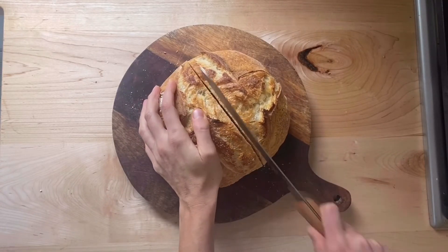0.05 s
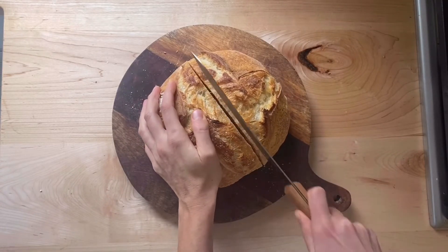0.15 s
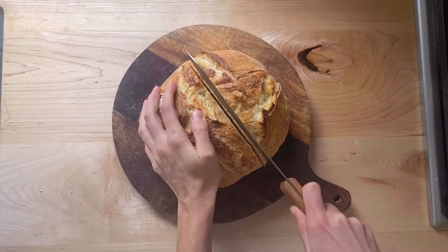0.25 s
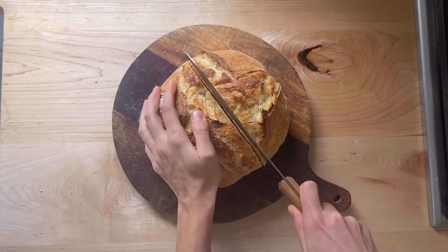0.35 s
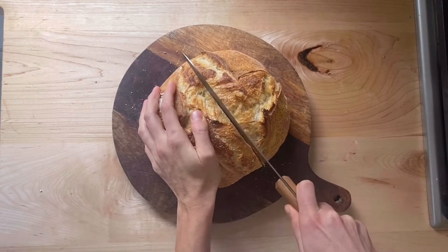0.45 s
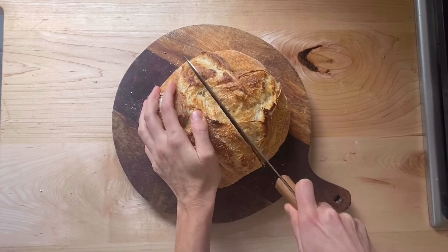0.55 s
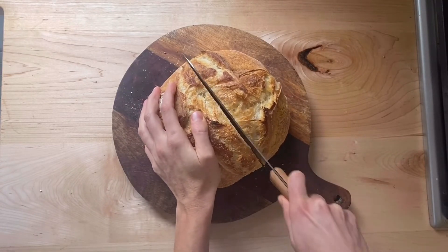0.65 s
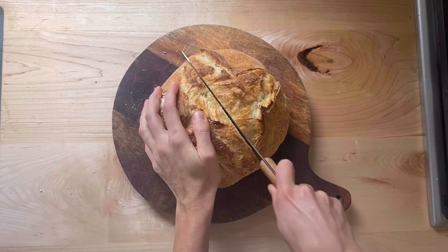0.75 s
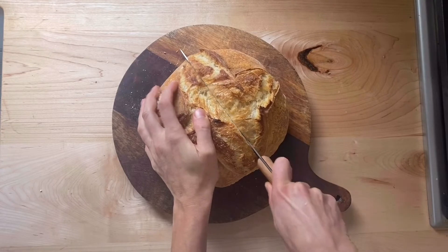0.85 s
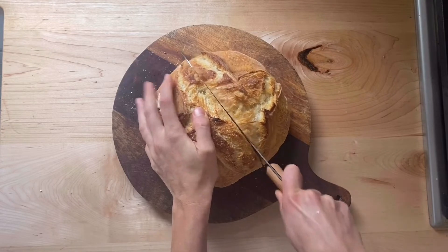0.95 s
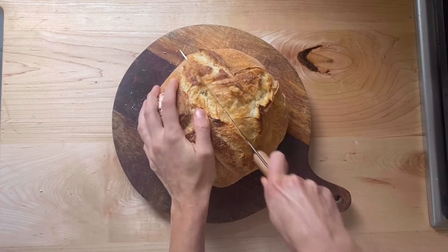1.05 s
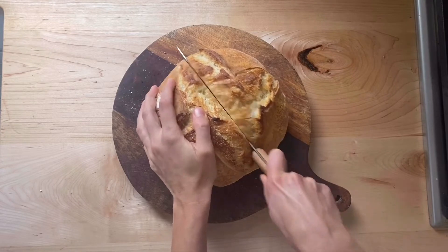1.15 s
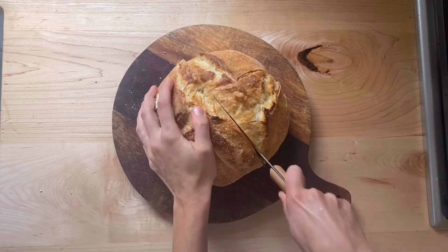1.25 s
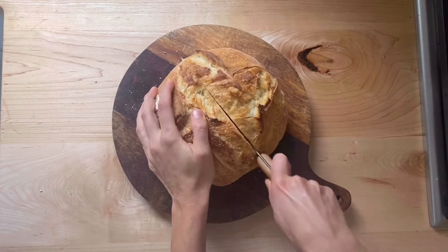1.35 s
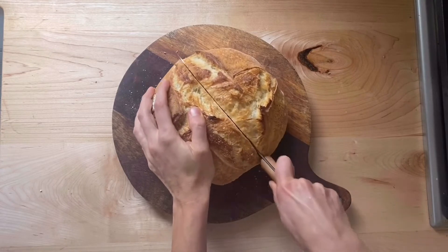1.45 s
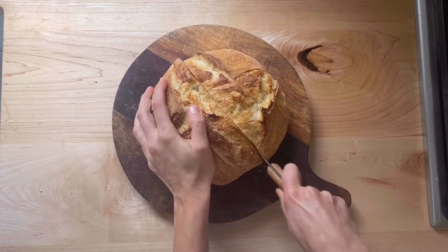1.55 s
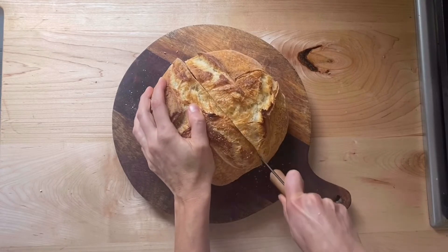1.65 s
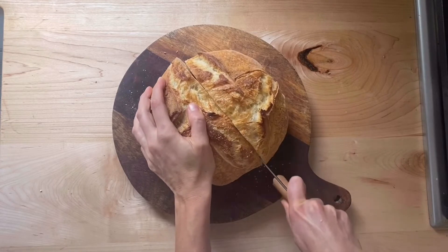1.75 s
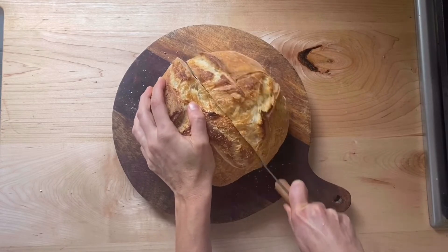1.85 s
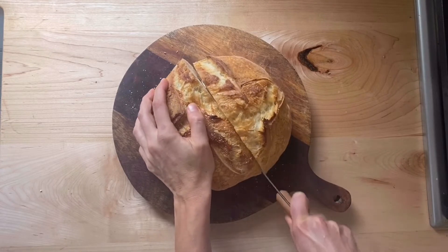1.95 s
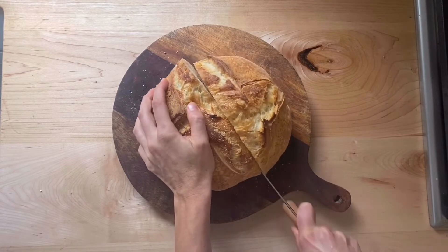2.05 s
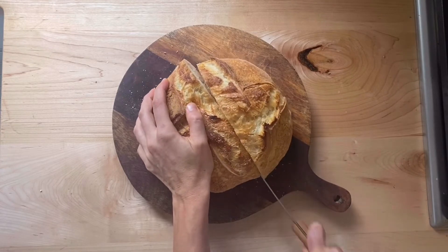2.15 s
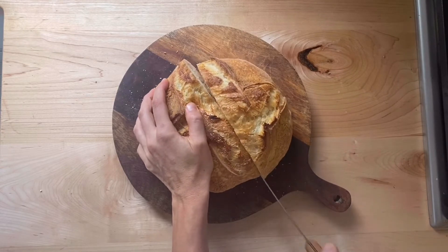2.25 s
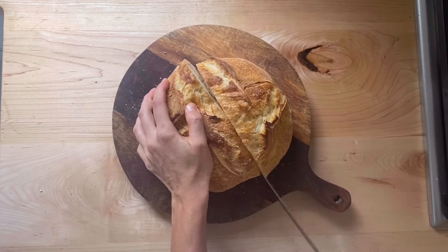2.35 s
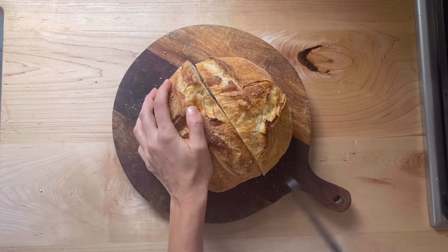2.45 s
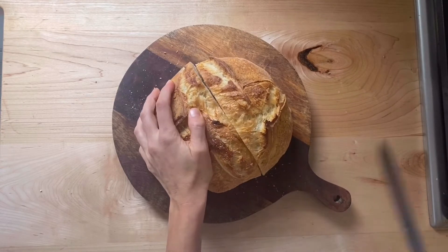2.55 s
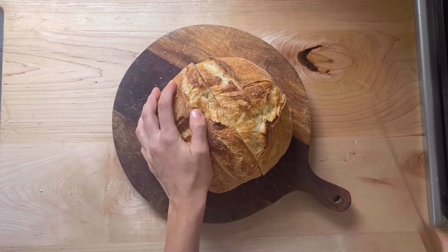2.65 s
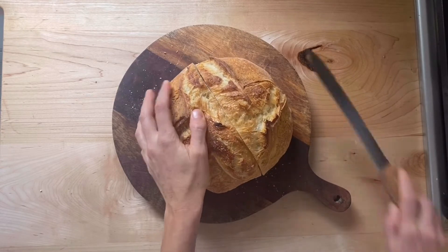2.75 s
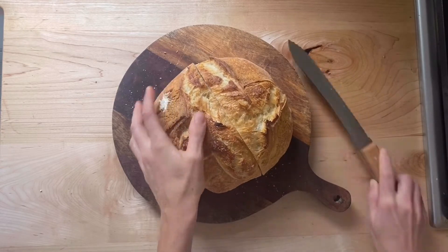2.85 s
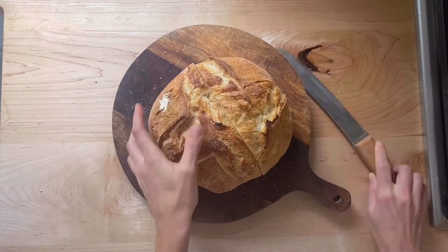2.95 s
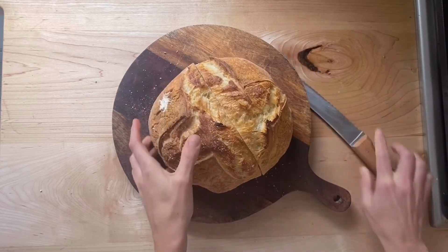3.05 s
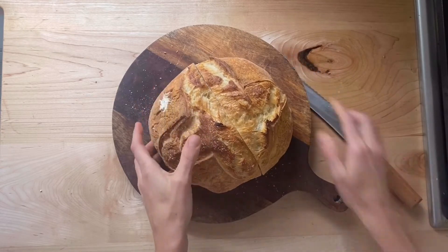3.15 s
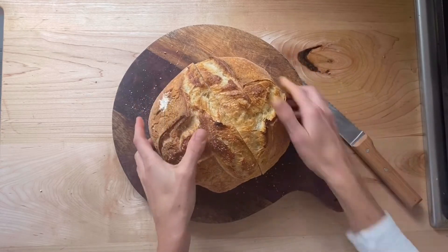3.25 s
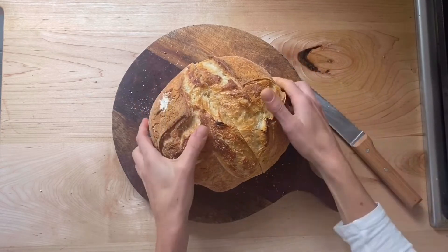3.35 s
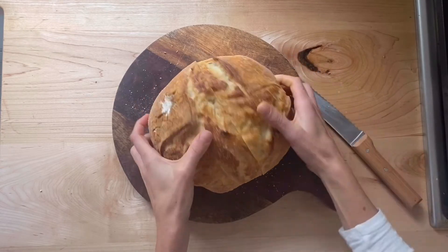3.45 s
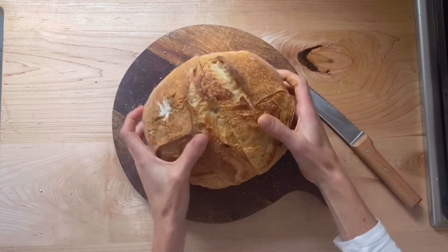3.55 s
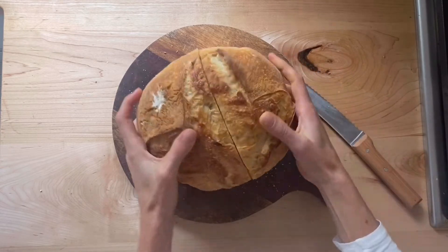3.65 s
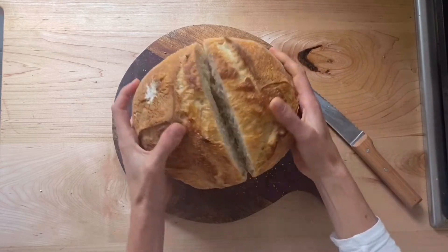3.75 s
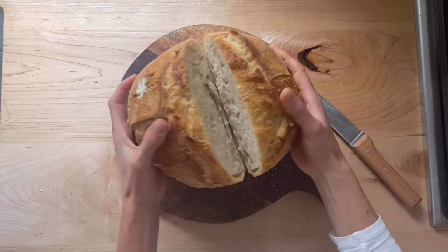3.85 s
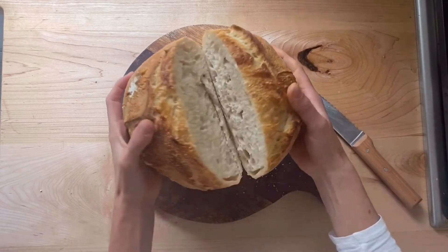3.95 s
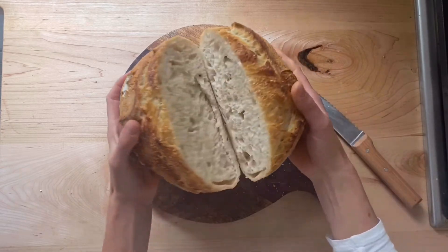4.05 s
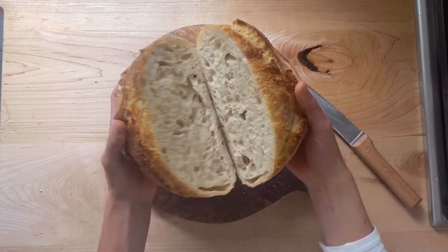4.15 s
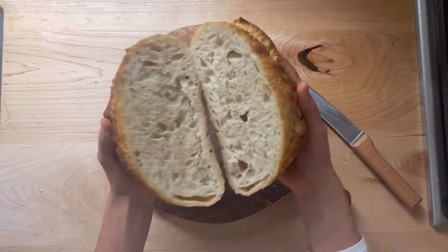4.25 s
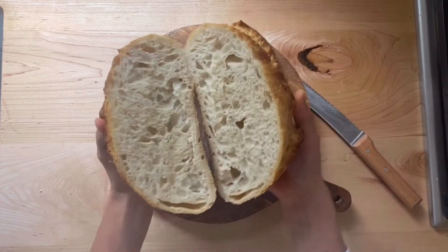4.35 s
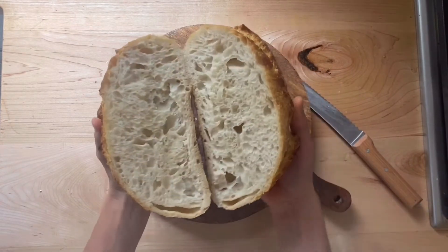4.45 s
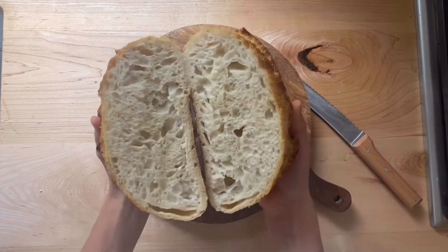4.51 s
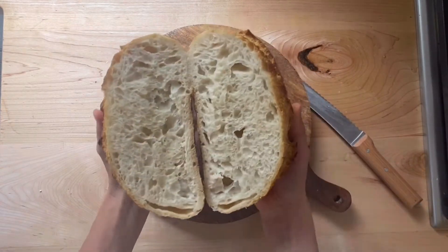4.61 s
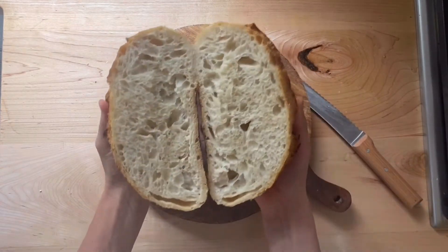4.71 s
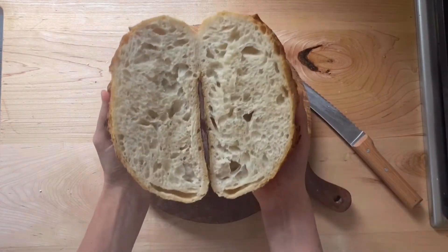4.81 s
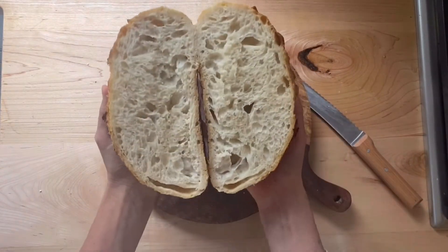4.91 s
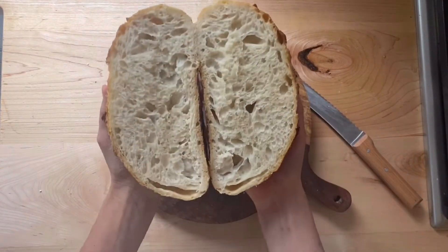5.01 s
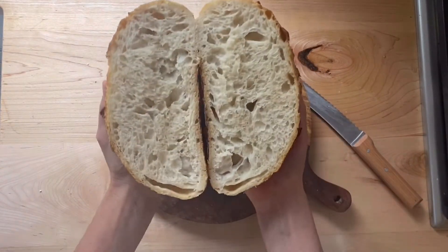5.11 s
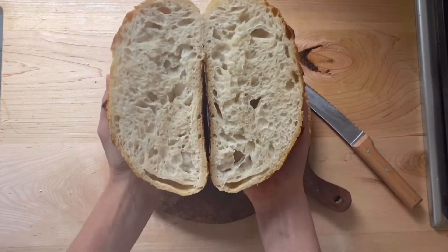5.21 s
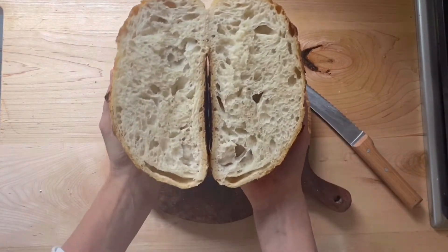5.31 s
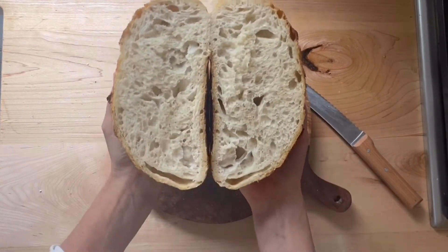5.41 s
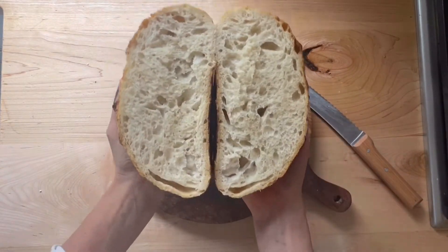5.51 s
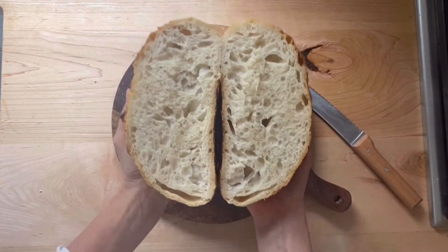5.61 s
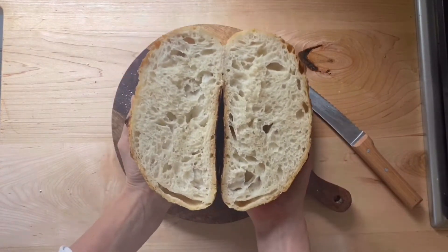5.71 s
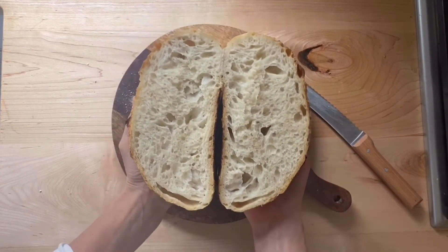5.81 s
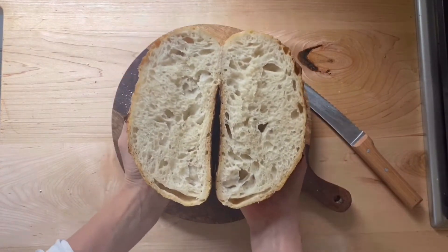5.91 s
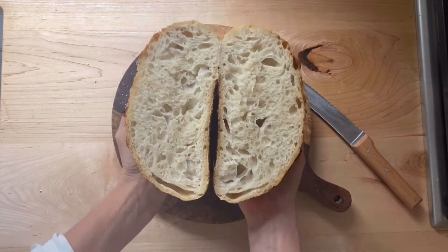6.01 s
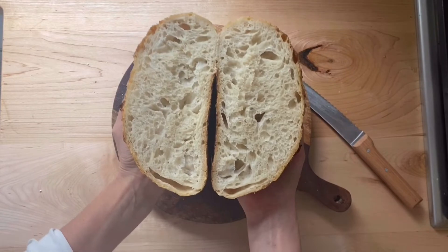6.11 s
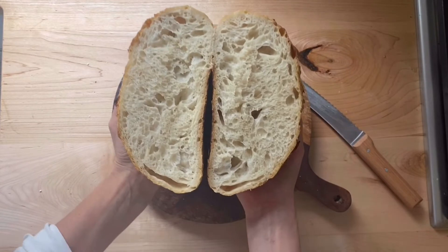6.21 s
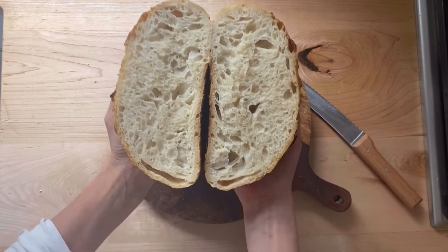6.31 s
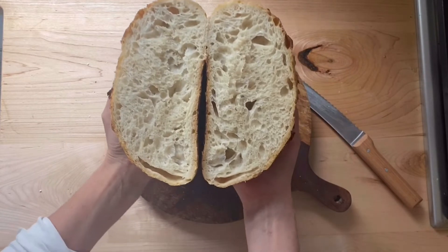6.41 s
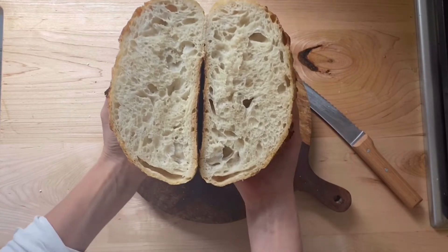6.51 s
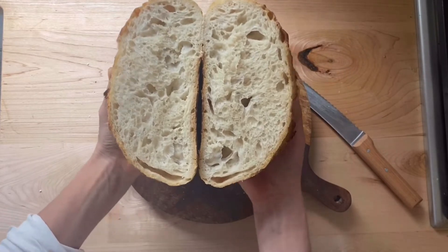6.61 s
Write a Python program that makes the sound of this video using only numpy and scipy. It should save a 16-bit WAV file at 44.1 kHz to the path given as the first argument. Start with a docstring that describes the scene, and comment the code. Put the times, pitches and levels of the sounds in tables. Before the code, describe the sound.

A serrated knife crunches through a crusty loaf, rasps sharply off a wooden board, clatters down, then hands crackle the bread open.

```python
"""Sawing and breaking a crusty loaf

A serrated knife saws through the crust on a wooden board, then rasps over the board as it is drawn out.
It is laid on the counter with a clink and a clatter; two hands break the loaf open and turn it.
Crust is clumped random fractures, filtered noise and flake pitches; blade and wood are decaying modes
or resonances. Close stereo microphone, slightly live kitchen, low steady rumble of filtered noise."""
import sys
import numpy as np
from scipy import signal
from scipy.fft import rfft, irfft, next_fast_len
from scipy.io import wavfile
from scipy.ndimage import map_coordinates

SR = 44100
rng = np.random.default_rng(int(sys.argv[2]) if len(sys.argv) > 2 else 0)


def inscribe(sig):
    """Save sig as 16-bit PCM at rate SR to the path in sys.argv[1].

    A 1-D sig is mono; a 2-D sig holds one channel per row.
    Samples are clipped to [-1, 1] before scaling.
    """
    pcm = np.round(np.clip(np.atleast_2d(sig).T, -1, 1) * 32767)
    wavfile.write(sys.argv[1], SR, pcm.astype(np.int16))


N = 294147

# Splintering crust, relative spectrum: [f/Hz, level/dB]
BRITTLE_SPECTRUM = [(2000, -12), (5000, -0.5), (7500, 1.5), (11000, -6), (13000, -5), (15200, -3),
                    (17000, -30.5)]
# Dull body of the loaf, relative spectrum: [f/Hz, level/dB]
LOAF_SPECTRUM = [(25, -31), (60, 5), (100, -0.5), (170, 2), (250, -1.5), (340, -3.5), (500, -12.5),
                 (900, -18.5), (3000, -72.5)]


def amp(db):
    """Decibels to gain."""
    return 10 ** (np.asarray(db) / 20)


def unit(x):
    """Scale to rms 1."""
    return x / np.sqrt(np.mean(x ** 2) + 1e-20)


def crest(x):
    """Scale to peak 1."""
    return x / np.abs(x).max()


def along(points, hz):
    """Read (f/Hz, value) points on a log frequency axis."""
    f, v = np.transpose(points)
    return np.interp(np.log(hz + 1), np.log(f), v)


def filtered(x, response):
    """Apply a complex response of frequency."""
    m = next_fast_len(N + 8192)
    spectrum = rfft(x, m) * response(np.fft.rfftfreq(m, 1 / SR))
    return irfft(spectrum, m)[..., :N]


def coloured(x, spectrum, size=4096):
    """Minimum-phase filter of unit energy with the given relative spectrum."""
    gain = amp(along(spectrum, np.fft.rfftfreq(size, 1 / SR)))
    cepstrum = irfft(np.log(gain))
    cepstrum[1:size // 2] *= 2  # fold to the causal half
    cepstrum[size // 2 + 1:] = 0
    kernel = irfft(np.exp(rfft(cepstrum)))
    return signal.oaconvolve(x, kernel / np.linalg.norm(kernel))[:N]


def resonate(x, peaks):
    """Body of (f/Hz, width/Hz, level/dB) resonances of alternating sign, at unit power gain."""
    def body(f):
        gain = 0
        for k, (centre, width, db) in enumerate(peaks):
            peak = 1j * f * width / (centre * centre - f * f + 1j * f * width)
            gain = gain + (-1) ** k * amp(db) * peak
        return gain / np.sqrt(np.mean(np.abs(gain) ** 2))
    return filtered(x, body)


def add(track, s, sound):
    """Mix a sound in at time s."""
    part = track[max(round(s * SR), 0):][:len(sound)]
    part += sound[:len(part)]


def fade(t, t60_s):
    """Exponential decay, 60 dB in t60_s."""
    return np.exp(-np.log(1000) * t / t60_s)


def burst(t, t60_s, rise_share=0.033):
    """Puff of noise that swells quickly and dies."""
    rise = 1 - np.exp(-t / (rise_share * t60_s))
    return 2 * rng.standard_normal(len(t)) * fade(t, t60_s) * rise


def ring(t, modes, detune=0, centre_hz=1000, focus_db=0, scatter_db=2):
    """Decaying modes, random strength, sign and tuning, weaker by focus_db per octave off centre."""
    hz, db, t60_s = np.transpose(modes)[:, :, None]
    db = db - focus_db * np.abs(np.log2(hz / centre_hz))
    db = db + scatter_db * rng.standard_normal(hz.shape)
    strength = amp(db) * rng.choice([-1, 1], hz.shape)
    hz = hz * np.exp(detune * rng.standard_normal(hz.shape))
    partials = strength * np.sin(2 * np.pi * hz * t) * fade(t, t60_s)
    return np.sum(partials, axis=0) / np.linalg.norm(strength)


def wobble(rate_hz):
    """Random piecewise-linear curve, rate_hz knots a second."""
    knots = rng.standard_normal(4096)
    return map_coordinates(knots, [np.arange(N) * rate_hz / SR], order=1, mode="wrap")


def efforts(rows, attack_s, t60_s, sag_db_per_s=0):
    """Gain curve per dB column: each (start/s, length/s, level/dB..) movement swells, holds and dies."""
    gains = np.zeros((len(rows[0]) - 2, N))
    t = np.arange(SR) / SR
    for start_s, length_s, *dbs in rows:
        release = fade(np.maximum(t - length_s, 0), t60_s)
        shape = np.minimum(t / attack_s, 1) * amp(-sag_db_per_s * t) * release
        for gain, db in zip(gains, dbs):
            add(gain, start_s, amp(db) * shape)
    return gains


def fractures(rate_hz, size_db, clump_db, clump_hz):
    """Random tiny breaks of uneven size and sign that come in clumps; rms 1."""
    hits = rng.random(N) < rate_hz / SR
    size = np.clip(rng.standard_normal(N), -2, 2)
    pulses = hits * rng.choice([-1, 1], N) * amp(size_db * size)
    return unit(pulses * amp(clump_db * np.tanh(wobble(clump_hz))))


def flake_ticks(rate_hz=16, low_hz=650, high_hz=5200, size_db=3, count=9, clump_db=2):
    """Crumbs of crust pop off in flurries, each size resonating at its own pitch; rms 1."""
    ticks = np.zeros(N)
    for hz in np.geomspace(low_hz, high_hz, count):
        pops = fractures(rate_hz, size_db, clump_db, clump_hz=45)
        ticks += unit(signal.lfilter(*signal.iirpeak(hz, 4, fs=SR), pops))
    return unit(ticks)


def crunch(effort, breaks, ticks_db, crust_db, brittle_db, push_db):
    """Small breaks and stray larger ticks sound in the crust; the soft crumb answers with a dull rumble."""
    # Crust body, relative spectrum: [f/Hz, level/dB]
    crust_spectrum = [(100, -32.5), (300, -7.5), (650, 8.5), (1000, -4.5), (1800, 0), (3000, -2.5),
                      (4500, -5), (6500, -13.5), (9000, -15), (16000, -30)]
    crust, brittle, push = effort
    crackle = amp(crust_db) * coloured(crust * breaks, crust_spectrum)
    splinters = amp(brittle_db) * coloured(brittle * breaks, BRITTLE_SPECTRUM)
    ticks = amp(ticks_db) * crust * flake_ticks()
    tugs = fractures(rate_hz=700, size_db=-1.5, clump_db=3, clump_hz=25)
    return crackle + splinters + ticks + amp(push_db) * coloured(push * tugs, LOAF_SPECTRUM)


def reflections(x, t60s, size):
    """Diffuse echoes at two capsules after 2.5 ms; each frequency dies at its own speed."""
    hz, t, z = signal.stft(rng.standard_normal((2, size)), SR, nperseg=256)
    decay = fade(t, along(t60s, hz)[:, None])
    tail = signal.istft(z * decay, SR, nperseg=256)[1]
    tail = np.pad(tail / np.linalg.norm(tail[0]), ((0, 0), (SR // 400, 0)))
    return signal.fftconvolve(x[None], tail, axes=1)[:, :N]


def room_tone(level_db=-59, apart=0.91):
    """Steady low kitchen rumble: filtered noise, partly shared by the capsules."""
    # Rumble, relative spectrum: [f/Hz, level/dB]
    rumble_spectrum = [(20, -40), (40, -15), (65, -1), (90, -0.5), (125, -13.5), (175, -7.5), (240, -8),
                       (310, -7.5), (450, -16.5), (700, -22), (1100, -36), (2000, -44), (6000, -47),
                       (16000, -53)]
    shared, left, right = [unit(coloured(rng.standard_normal(N), rumble_spectrum)) for _ in range(3)]
    return amp(level_db) * unit(shared + apart * np.array([left, right]))


def rubs(broad_db=-6, scrape_db=-2, attack_s=0.035, t60_s=0.08):
    """Palms brush the floury crust: fine grains, broad plus a resonant scrape at each slide's pitch."""
    # Palms sliding over the crust: [start/s, length/s, relative level/dB, scrape f/Hz]
    palm_slides = [(3.302, 0.064, -79, 5100), (3.34, 0.11, -70.5, 5080), (3.457, 0.16, -69.5, 5500),
                   (5.09, 0.016, -69, 4500), (5.231, 0.063, -75.5, 2006), (5.273, .025, -78, 4180),
                   (5.426, 0.028, -63.5, 2020), (5.665, 0.016, -76.5, 3510), (6.066, 0.037, -66, 2000),
                   (6.287, 0.057, -75.5, 4000), (6.356, 0.035, -65, 5250), (6.403, 0.03, -63.5, 2930),
                   (6.444, 0.015, -59, 1390), (6.468, .02, -70.5, 4000), (6.52, 0.018, -70, 3200),
                   (6.547, 0.025, -64, 5800), (6.59, 0.018, -62, 2440)]
    grains = fractures(rate_hz=2500, size_db=3.5, clump_db=9.0, clump_hz=120)
    broad = coloured(grains, [(30, -40.0), (200, -7.0), (600, 13.5), (1200, 6.0), (2200, 9.5),
                              (5500, 0.0), (9000, -1.0), (15000, -30.5)])
    slides = np.zeros(N)
    for *slide, hz in palm_slides:
        scrape = unit(signal.lfilter(*signal.iirpeak(hz, 3.1, fs=SR), grains))
        effort = efforts([slide], attack_s, t60_s)[0]
        slides += effort * (amp(broad_db) * broad + amp(scrape_db) * scrape)
    return slides


def tear(attack_s=0.015, t60_s=0.42):
    """Strands of crumb part in a dense, grainy rustle."""
    # Soft crumb tearing: [start/s, length/s, level/dB]
    tearing = [(4.535, 0.036, -50)]
    strands = fractures(rate_hz=1800, size_db=2, clump_db=3, clump_hz=130)
    strands = strands * efforts(tearing, attack_s, t60_s)[0]
    return coloured(strands, [(100, -21.0), (500, -14), (850, 4), (1400, -3), (2200, 2.0), (4000, 0.5),
                              (6500, -8.5), (9000, -31), (15000, -32.0)])


def handling():
    """The crust crackles and rustles where fingers press it; a squeeze builds and relaxes slowly."""
    # Fingers squeezing and prising: [start/s, length/s, crunch/dB, brittle treble/dB, push/dB], relative
    grips = [(3.25, 0.2, -70, -83, -60), (3.36, 0.08, -63.5, -70.5, -54), (3.47, 0.19, -64, -70, -56),
             (3.72, 0.29, -60.5, -86, -71), (3.92, 0.19, -67, -56.5, -66), (4.19, 0.17, -78, -80, -61),
             (4.36, 0.12, -59.5, -71, -56), (4.51, 0.13, -60.5, -64, -56), (4.84, 0.053, -62.5, -71.5, -51),
             (6.5, 0.18, -75, -74, -56)]
    effort = efforts(grips, attack_s=0.03, t60_s=0.47, sag_db_per_s=7.5)
    breaks = fractures(rate_hz=1600, size_db=1, clump_db=9.5, clump_hz=60)
    return crunch(effort, breaks, ticks_db=-6, crust_db=-3.5, brittle_db=1.0, push_db=-7.5)


def landing(clink_t60_s=0.034, knock_t60_s=0.035, steel_db=-11, clink_db=-9, wood_db=-8, knock_db=-10,
            rattle_db=-6, focus_db=4):
    """The blade clinks down, then handle and blade rock and rattle to rest: struck modes plus noise puffs."""
    # Knife striking the counter: [t/s, steel/dB, wood/dB, strongest wood f/Hz, rattle/dB], relative
    contacts = [(2.813, -49, -44.5, 350, -63.5), (2.823, -16, -31.5, 354, -42.5),
                (2.827, -11.5, -17, 340, -36), (2.890, -20.5, -32, 305, -35), (2.896, -23.5, -26, 330, -37),
                (2.910, -33.5, -19, 600, -19.5), (2.924, -31.5, -18, 330, -31), (2.929, -40, -19, 423, -27),
                (2.943, -50, -23, 690, -23.5), (2.955, -30, -18.5, 680, -30),
                (2.961, -45, -21.5, 720, -42.5), (2.980, -53, -27, 400, -49),
                (2.991, -28.5, -28.5, 650, -43.5), (3.0, -24, -24.5, 400, -29.5),
                (3.012, -49, -22, 700, -33.5), (3.019, -50, -21, 545, -40), (3.031, -35, -27, 330, -37),
                (3.043, -47, -29.5, 400, -46), (3.054, -54, -29.5, 597, -50), (3.071, -56, -30, 420, -58.5),
                (3.084, -63, -40, 500, -64), (3.103, -65, -49.5, 300, -65), (3.164, -49, -37, 1100, -44),
                (3.18, -64, -41, 1010, -43), (3.2, -54, -41, 400, -45), (3.225, -69, -44, 260, -70)]
    # Blade lying free, modes: [f/Hz, relative level/dB, t60/s]
    blade_modes = [(1744, -17, .12), (2446, -8.5, .08), (2994, -11.5, 0.11), (3427, -2, 0.082),
                   (3683, -7.5, 0.075), (3810, -8.5, .06), (4659, -10, 0.081), (5040, -10, .07),
                   (5670, -5.5, 0.0546), (5860, -7, 0.068), (9480, -8, .035), (10530, -8.5, .09),
                   (11310, -12, .07), (15200, -5, .04)]
    # Handle on the counter, modes: [f/Hz, relative level/dB, t60/s]
    counter_modes = [(170.6, -8.5, 0.11), (196, 1.5, 0.14), (332.7, -3, 0.15), (366, 1, 0.07),
                     (473, -17, 0.052), (582.5, -8.5, .07), (627.5, -2, 0.081), (670, -1.5, 0.06),
                     (730, -1, 0.099), (811, -11, 0.058), (880, -14.5, 0.066), (1076, -2, 0.11),
                     (1320, -9.5, .05)]
    # Handle chattering against the blade, modes: [f/Hz, relative level/dB, t60/s]
    rattle_modes = [(1514, -8, 0.027), (1883, -7, 0.015), (1920, -1, 0.018), (2067, -0.5, .03),
                    (2200, -7, 0.015), (2820, -7.5, 0.035)]
    blade_detune = 0.014  # fingers still on the handle shift the pitches at each contact
    contact_detune = 0.011  # each contact lands on another spot of the counter
    rings, clinks, knocks = np.zeros((3, N))
    t = np.arange(SR // 3) / SR
    for s, steel, wood, hz, rattle in contacts:
        add(rings, s, amp(steel + steel_db) * ring(t, blade_modes, blade_detune))
        add(rings, s, amp(wood + wood_db) * ring(t, counter_modes, contact_detune, hz, focus_db))
        add(rings, s, amp(rattle + rattle_db) * ring(t, rattle_modes, contact_detune))
        add(clinks, s, amp(steel + clink_db) * burst(t, clink_t60_s))
        add(knocks, s, amp(wood + knock_db) * burst(t, knock_t60_s))
    clinks = coloured(clinks, [(30, -52.0), (300, -26.0), (1000, -9.5), (3000, 6.5), (5000, 10),
                               (7000, 9), (10000, 2.5), (13000, 5.5), (15500, -1)])
    knocks = coloured(knocks, [(20, -54.5), (70, -22.5), (130, -10.0), (190, -0.5), (270, -16.5),
                               (360, 8.5), (480, -3.5), (700, 3.0), (1200, -7.5), (2200, -16),
                               (5000, -39.0)])
    return rings + clinks + knocks


def drag(tooth_hz=420, unevenness=0.25, grit=1.0, snag_db=4.5, rasp_db=-2):
    """Serrations snag over the board and ring its resonances; the slipping tip rings brighter."""
    # Teeth on the board, hardest as the tip leaves the loaf:
    # [start/s, length/s, rasp/dB, board ring/dB, tip ring/dB], relative
    scrapes = [(1.76, 0.071, -60, -54, -63.5), (2.02, 0.21, -48.5, -51, -58),
               (2.18, 0.016, -43, -53.5, -43.5), (2.192, 0.0092, -25, -38.5, -25.5),
               (2.205, 0.013, -40.5, -29, -42), (2.224, 0.014, -41.5, -35.5, -47.5),
               (2.243, 0.0083, -41.5, -28, -46.5), (2.258, 0.026, -43.5, -46, -52.5),
               (2.3, 0.035, -51.5, -62.5, -62.5)]
    # Board resonances: [f/Hz, width/Hz, relative level/dB]
    board_peaks = [(300, 37, -6.5), (670, 56, 2), (925, 90, -7), (1276, 76, 3), (1460, 130, -13.5),
                   (2150, 110, -14.5), (2940, 70, -12), (3710, 70, -15.5), (4370, 80, -22)]
    # Tip slipping off the board, resonances: [f/Hz, width/Hz, relative level/dB]
    tip_peaks = [(345, 82, -9.5), (1240, 92, 0.5), (1700, 300, -11.5), (2200, 170, 0), (2710, 200, -6),
                 (2940, 100, 1), (3100, 80, -6), (4950, 150, -12.5), (5600, 200, -14)]
    passed = np.floor(np.cumsum(tooth_hz * np.exp(unevenness * wobble(150))) / SR)
    teeth = unit(np.diff(passed, prepend=0) * amp(0.6 * wobble(300)))
    force = unit(teeth + grit * rng.standard_normal(N))
    # the tip bites and slips at once
    rasping, ringing, slipping = efforts(scrapes, attack_s=0.0032, t60_s=0.031)
    snags = unit(amp(snag_db * np.tanh(wobble(130))))
    rasp = coloured(force * snags * rasping, [(20, -35.5), (80, -11), (200, 10.5), (700, 10.0), (1400, 6.5),
                                              (2500, 6), (5000, 0.5), (10000, -5.0), (16000, -13.5)])
    board = resonate(force * ringing, board_peaks)
    tip = resonate(force * slipping, tip_peaks)
    return board + tip + amp(rasp_db) * rasp


def catches(scrape_t60_s=0.046, ring_t60_s=0.073, ring_attack_s=0.0076, upper_db=-8, scrape_db=-6,
            squeak_db=3, chatter_db=4, waver=0.02):
    """The first teeth skid on hard crust and draw chattering chirps at two blade pitches."""
    # Teeth catching: [t/s, skid/dB, ring/dB, lower f/Hz, upper f/Hz], levels relative
    tooth_catches = [(0.113, -59, -49, 4040, 10470), (0.151, -42.5, -41, 5680, 10600),
                     (0.305, -35, -36.5, 4660, 11500), (0.344, -44.5, -38.5, 4690, 11450),
                     (0.55, -45, -51, 4680, 11500)]
    skids, squeaks = np.zeros((2, N))
    t = np.arange(SR // 4) / SR
    swell = fade(t, ring_t60_s) * (1 - np.exp(-t / ring_attack_s))
    for s, skid_db, ring_db, lower_hz, upper_hz in tooth_catches:
        add(skids, s, amp(skid_db) * burst(t, scrape_t60_s))
        turns = np.cumsum(1 + waver * wobble(430)[:len(t)]) / SR  # the crust's grip keeps shifting
        chatter = chatter_db * np.tanh(wobble(300)[:len(t)])
        grip = swell * amp(ring_db + squeak_db + chatter)
        lower = np.sin(2 * np.pi * lower_hz * turns)
        upper = amp(upper_db) * np.sin(2 * np.pi * upper_hz * turns)
        add(squeaks, s, grip * (lower + upper))
    scrape = coloured(skids, [(20, -30.0), (150, 3), (500, 2), (2000, 6.0), (5000, 3), (11000, -1),
                              (16000, -8.0)])
    return squeaks, amp(scrape_db) * scrape


def bumps(t60_s=0.11, attack_s=0.032, tone_db=-2, thud_db=-12, glide=0.9, settle_s=0.0055):
    """The loaf rocks on the board: soft damped thuds that drop quickly to their pitch."""
    # Loaf bumping on the board: [t/s, relative level/dB, settled f/Hz]
    loaf_bumps = [(0.834, -35.5, 82), (0.927, -26.5, 160), (0.985, -24.5, 315), (1.102, -23, 124),
                  (1.124, -28, 185), (1.15, -23.5, 72), (1.31, -31, 111), (1.35, -33.5, 310),
                  (1.691, -33, 308), (3.431, -37.5, 134.4), (3.937, -49, 262), (4.095, -30.5, 220),
                  (4.885, -42.5, 131), (5.243, -39, 209), (5.435, -43, 229), (6.468, -38.5, 182)]
    tones, thuds = np.zeros((2, N))
    t = np.arange(SR // 5) / SR
    turns = np.cumsum(1 + glide * np.exp(-t / settle_s)) / SR
    shape = fade(t, t60_s) * (1 - np.exp(-t / attack_s))
    for s, db, hz in loaf_bumps:
        add(tones, s, amp(db + tone_db) * np.sin(2 * np.pi * hz * turns) * shape)
        add(thuds, s, amp(db + thud_db) * burst(t, t60_s))
    return tones + coloured(thuds, LOAF_SPECTRUM)


def crumbles(attack_s=0.002, t60_s=0.025):
    """A patch of crust gives way in a quick run of small breaks."""
    # Patches crumbling: [start/s, length/s, level/dB]
    patches = [(0.542, .016, -56), (0.585, .014, -56.5), (0.758, .008, -54.5), (0.832, .014, -48.5),
               (0.929, .012, -44), (0.969, 0.02, -37.5), (1.738, .014, -46.5), (3.932, .012, -52.5),
               (3.955, .008, -55), (3.997, .01, -48), (4.016, .018, -51), (4.142, .018, -53.5),
               (4.548, 0.0096, -57), (4.868, 0.0071, -69), (4.9, 0.017, -67.5)]
    breaks = fractures(rate_hz=1400, size_db=2.5, clump_db=2.5, clump_hz=250)
    breaks = breaks * efforts(patches, attack_s, t60_s)[0]
    return coloured(breaks, [(100, -26), (400, -9), (1000, -0.5), (1900, 4), (3000, -4.5), (5500, -8.5),
                             (9000, -16), (16000, -28.5)])


def snaps(swell_s=0.00044, flake_t60_s=0.011, crack_t60_s=0.014, chip_t60_s=0.0055, body_t60_s=0.012,
          pop_db=-6, flake_db=-7, crack_db=-22, chip_db=7, body_db=2, lead_s=0.012, lead_db=-15.5):
    """A flake strains and breaks: pitched pop, damped band, crack, bright splinter, hollow loaf knock."""
    # Crust breaking: [t/s, level/dB, flake f/Hz, treble/dB, hollow body/dB], levels relative; the loud break at
    # # 4.06 s is echoed quickly and more weakly at 4.066 and 4.071 s
    breaks = [(0.116, -39.5, 1830, -47.5, -55), (0.251, -46, 3300, -64, -66), (0.282, -35, 2930, -58, -66),
              (0.308, -31.5, 4640, -51, -42.5), (0.544, -40, 1860, -56, -55),
              (0.692, -39, 2340, -63.5, -59), (0.834, -33, 1532, -57.5, -57), (0.923, -38, 1650, -46, -59),
              (0.929, -34, 1900, -47.5, -39), (0.934, -30, 1790, -46, -57.5),
              (0.971, -22.5, 2630, -41.5, -58), (0.987, -18.5, 2920, -35, -34),
              (0.992, -18, 2670, -45, -43), (1.005, -15, 2840, -37.5, -36), (1.041, -28, 2850, -51, -70),
              (1.085, -35, 1360, -48, -42), (1.097, -26.5, 2080, -42, -42),
              (1.139, -28, 1480, -50.5, -53.5), (1.188, -29.5, 1800, -70, -48.5),
              (1.212, -35, 1850, -62, -65), (1.235, -33, 1640, -54, -79), (1.251, -27.5, 1790, -53, -57),
              (1.260, -31, 1540, -40, -68), (1.267, -27.5, 2240, -43.5, -49), (1.312, -34, 2080, -47, -53),
              (1.359, -40, 2260, -40, -51), (1.418, -35.5, 1430, -45, -57), (1.43, -48, 1390, -51, -46),
              (1.474, -40.5, 3826, -45.5, -65.5), (1.6, -46, 2610, -45.5, -63.5),
              (1.666, -31, 1780, -55.5, -57.5), (1.701, -21.5, 2280, -50.5, -50),
              (1.707, -22.5, 2000, -38, -39), (1.718, -29.5, 1819, -48.5, -55),
              (1.743, -24, 2440, -72, -45), (1.792, -35.5, 5570, -33, -48.5),
              (1.828, -38.5, 5703, -50, -62.5), (1.838, -30, 5515, -43, -61.5),
              (1.862, -43, 5060, -39, -62), (1.89, -33, 2564, -47.5, -58),
              (1.929, -32.5, 3170, -49.5, -59.5), (2.016, -42, 1350, -50, -54),
              (2.036, -27.5, 1540, -38.5, -52), (2.057, -44, 3000, -47.5, -54),
              (2.093, -44, 2470, -46.5, -52.5), (2.121, -24.5, 1540, -37.5, -44.5),
              (2.314, -29, 1853, -65, -53), (2.502, -58, 2970, -63, -69), (2.633, -47.5, 1397, -64.5, -69),
              (3.408, -41, 1030, -58.5, -62), (3.619, -58, 2060, -63, -72), (3.702, -46, 2730, -68, -55),
              (3.721, -45.5, 1140, -53.5, -66), (3.767, -46, 1112, -60.5, -63),
              (3.78, -48.5, 1974, -57.5, -58), (3.811, -38.5, 1213, -63.5, -63),
              (3.842, -37, 2010, -45.5, -54), (3.865, -41.5, 2100, -58.5, -64),
              (3.912, -33.5, 2200, -58, -61), (3.936, -31, 2280, -64.5, -44.5),
              (3.957, -29, 2000, -64.5, -65.5), (3.973, -29, 2213, -54, -56.5),
              (4.001, -35.5, 2030, -58, -70.5), (4.021, -34, 1804, -51, -65.5),
              (4.06, -11, 1930, -38.5, -35.5), (4.066, -24, 1300, -51, -38), (4.071, -27, 1970, -62, -49),
              (4.102, -22.5, 2580, -39, -59.5), (4.225, -60, 2340, -73, -80),
              (4.239, -36.5, 2200, -48.5, -72.5), (4.291, -47, 2100, -62, -67),
              (4.326, -42.5, 1590, -56.5, -68), (4.426, -42.5, 1710, -66, -62),
              (4.718, -44.5, 1500, -66, -61), (4.829, -28, 2320, -49, -79), (5.45, -64, 2120, -65, -65),
              (5.679, -61.5, 2200, -75, -81), (6.113, -45, 2016, -56, -56), (6.601, -56, 2190, -57, -69),
              (6.62, -50, 1150, -77, -59)]
    flakes, cracks, chips, bodies = np.zeros((4, N))
    t = np.arange(SR // 20) / SR
    swell = t / swell_s * np.exp(1 - t / swell_s)
    strain = amp(lead_db) * t / lead_s * (t < lead_s)  # the crust strains just before it gives
    for s, db, hz, treble_db, hollow_db in breaks:
        band = signal.butter(2, [hz * 0.56, hz * 1.76], "bandpass", fs=SR)
        add(flakes, s, amp(db + pop_db) * swell * np.sin(2 * np.pi * hz * t))
        add(flakes, s, amp(db + flake_db) * crest(signal.lfilter(*band, burst(t, flake_t60_s))))
        add(cracks, s - lead_s, amp(db + crack_db) * strain * rng.standard_normal(len(t)))
        add(cracks, s, amp(db + crack_db) * burst(t, crack_t60_s))
        add(chips, s, amp(treble_db + chip_db) * burst(t, chip_t60_s))
        add(bodies, s, amp(hollow_db + body_db) * burst(t, body_t60_s))
    cracks = coloured(cracks, [(150, -28.5), (1000, -7.5), (2000, -9), (3200, -1), (6000, 4.5),
                               (9000, -3.0), (15500, -16.5)])
    bodies = coloured(bodies, [(40, -37.0), (150, -8.5), (400, -2.0), (700, -2), (1500, -5.5),
                               (3000, -22.5), (9000, -49.5)])
    return flakes + cracks + bodies + coloured(chips, BRITTLE_SPECTRUM)


def sawing(rip_db=-7.5, tooth_hz=52, unevenness=0.35, bite_db=3):
    """Each stroke drags teeth through crust in uneven bites, rips out pieces and shoves the loaf."""
    # Blade strokes: [start/s, length/s, crunch/dB, brittle treble/dB, push on loaf/dB], levels relative
    strokes = [(0.106, 0.054, -53, -53.5, -49), (0.24, 0.058, -68, -57.5, -63),
               (0.28, 0.062, -59.5, -56.5, -50), (0.39, 0.2, -72, -85, -64),
               (0.53, 0.11, -61.5, -71, -54.5), (0.64, 0.077, -69, -70, -59),
               (0.76, 0.23, -58, -67.5, -54.5), (0.92, 0.1, -47, -50.5, -52.5),
               (1.08, 0.053, -44, -54.5, -42.5), (1.185, 0.2, -53, -62, -51.5),
               (1.41, 0.3, -61.5, -60.5, -60.5), (1.655, 0.2, -54.5, -61, -60.5),
               (1.78, 0.13, -54, -48.5, -54.5), (1.93, 0.075, -50.5, -65, -52.5),
               (2.01, 0.3, -46, -66.5, -48.5)]
    passed = np.cumsum(tooth_hz * np.exp(unevenness * wobble(40))) / SR
    bites = unit(amp(bite_db * np.cos(2 * np.pi * passed)))
    effort = efforts(strokes, attack_s=0.017, t60_s=0.22) * bites  # teeth bite, ease off and stop
    breaks = fractures(rate_hz=1000, size_db=1, clump_db=4.5, clump_hz=96)
    pieces = flake_ticks(rate_hz=72, low_hz=630, high_hz=4500, size_db=1, count=6, clump_db=8.5)
    rips = amp(rip_db) * effort[0] * pieces
    return rips + crunch(effort, breaks, ticks_db=-7.5, crust_db=-3.5, brittle_db=-2.5, push_db=0)


def scene(near_db=-7.0, room_db=-12, snap_send_db=-3, squeak_send_db=-8):
    """Bread and knife, quick counter reflections and kitchen tail; snaps and squeaks are driest."""
    # Kitchen decay: [f/Hz, t60/s]
    kitchen_t60s = [(100, 0.4), (500, 0.67), (1200, 0.48), (2200, 0.56), (6000, 0.78), (15000, 0.24)]
    squeaks, skids = catches()
    bread = sawing() + handling() + crumbles() + tear() + rubs() + bumps() + skids
    cracks = snaps()
    knife = drag() + landing()
    sent = bread + knife + amp(snap_send_db) * cracks + amp(squeak_send_db) * squeaks
    near = reflections(sent, [(200, 0.11), (3000, 0.17), (12000, 0.072)], size=8192)
    near = filtered(near, lambda hz: hz / (hz + 400))  # small nearby things reflect little bass
    far = reflections(sent, kitchen_t60s, size=32768)
    direct = bread + cracks + knife + squeaks
    return direct + amp(near_db) * near + amp(room_db) * far + room_tone()


def record(dry):
    """One capsule feeds the middle, one the sides, in shares that turn with frequency; then band limit."""
    # Phase between the stereo channels for direct sound: [f/Hz, phase/rad]
    channel_phase = [(0, .06), (200, .15), (650, .45), (1200, .35), (1800, .25), (2800, 1.15), (4400, 1.05),
                     (5200, .65), (6100, 1.7), (7300, 3.14), (8600, 4.4), (9900, 6.1), (11100, 6.45),
                     (12200, 8.2), (13700, 9.42), (14400, 9.9), (15600, 11.9)]
    top_hz = 16200

    def shares(hz):
        turn = np.interp(hz, *np.transpose(channel_phase)) / 2
        return np.array([np.cos(turn), 1j * np.sin(turn)])

    mid, side = filtered(dry, shares)
    stereo = np.array([mid + side, mid - side])
    return filtered(stereo, lambda hz: 1 / np.sqrt(1 + (hz / top_hz) ** 160))


dry = scene()
out = record(dry)
inscribe(out)
```